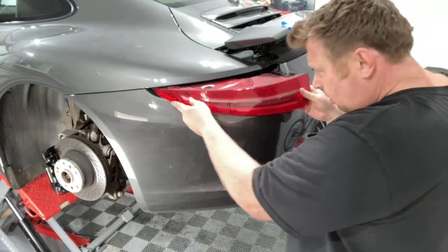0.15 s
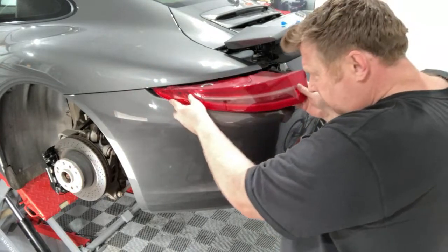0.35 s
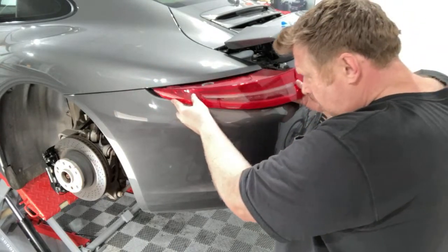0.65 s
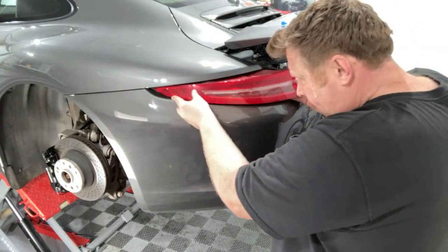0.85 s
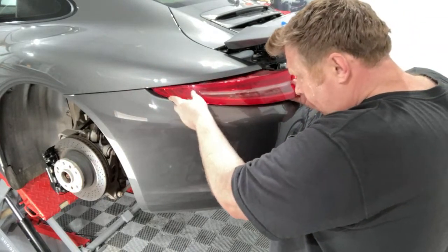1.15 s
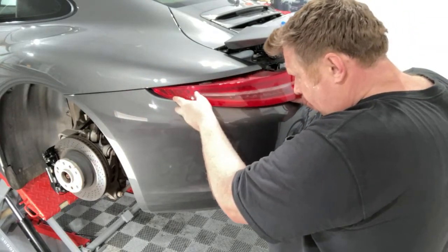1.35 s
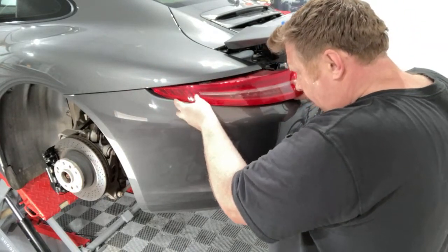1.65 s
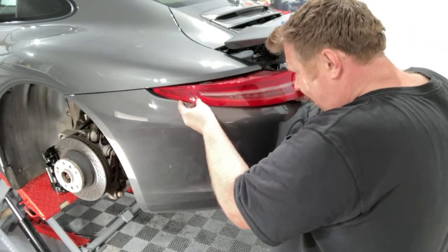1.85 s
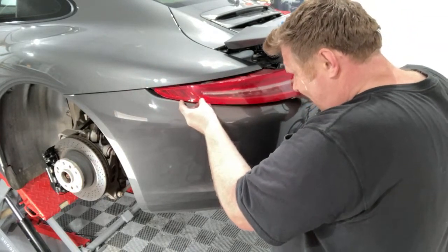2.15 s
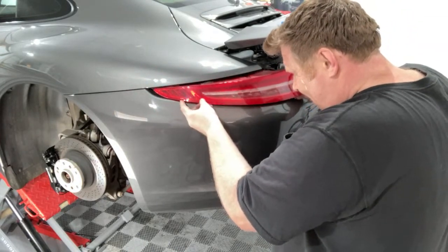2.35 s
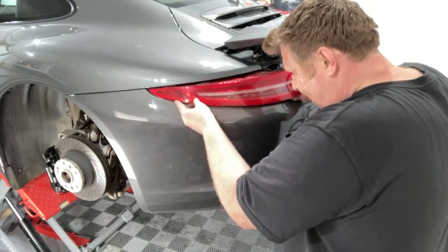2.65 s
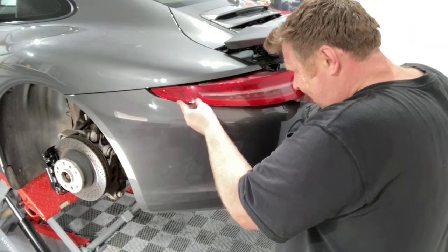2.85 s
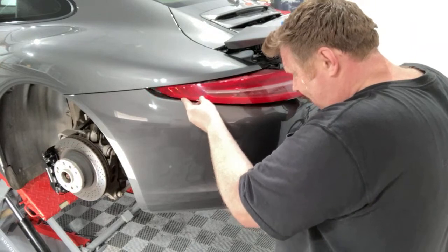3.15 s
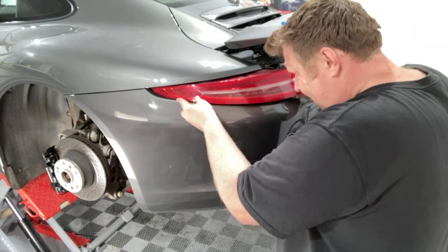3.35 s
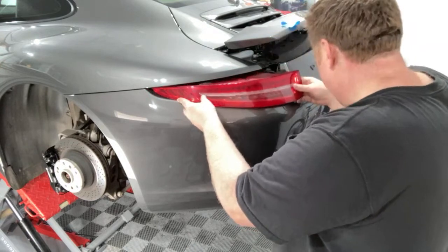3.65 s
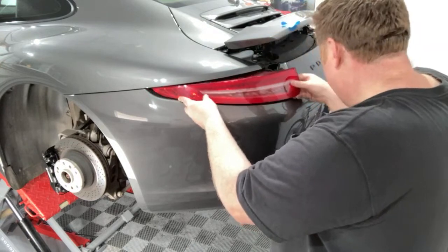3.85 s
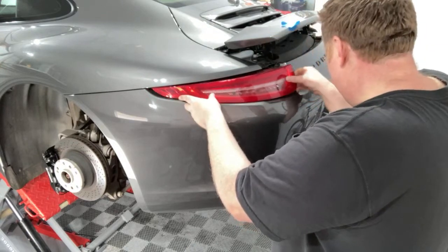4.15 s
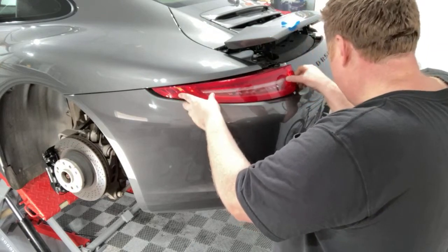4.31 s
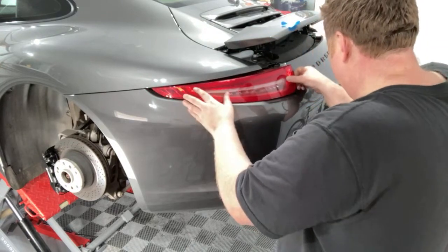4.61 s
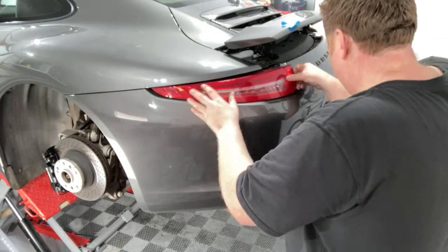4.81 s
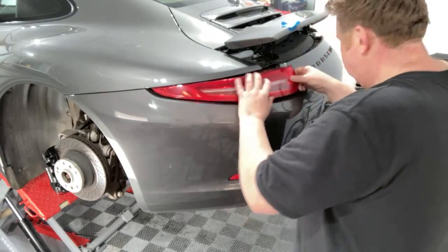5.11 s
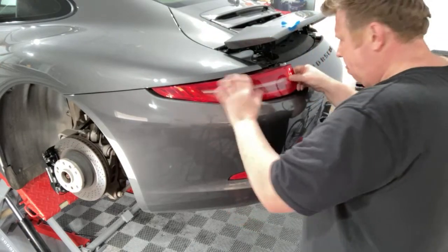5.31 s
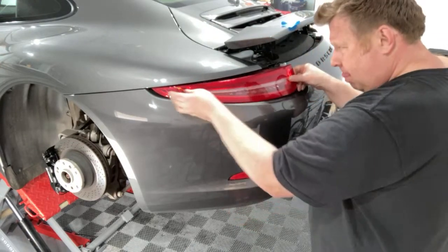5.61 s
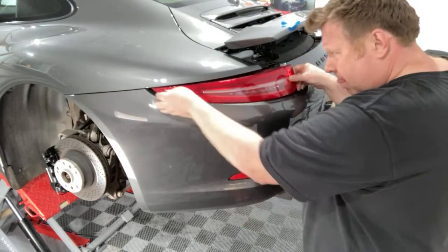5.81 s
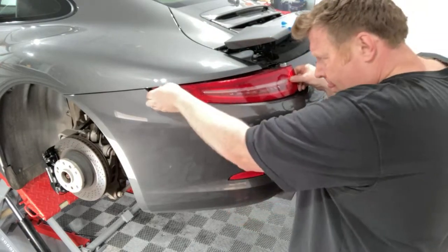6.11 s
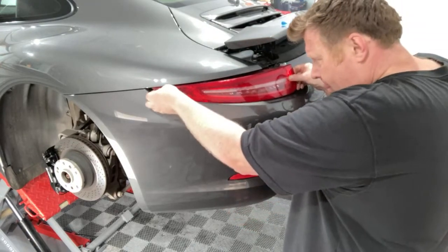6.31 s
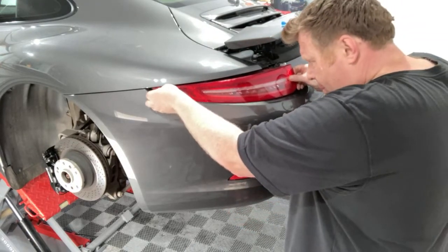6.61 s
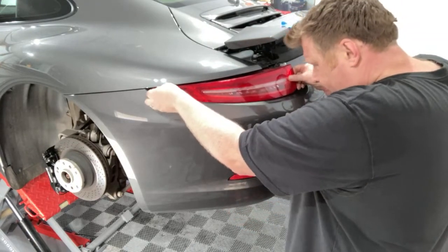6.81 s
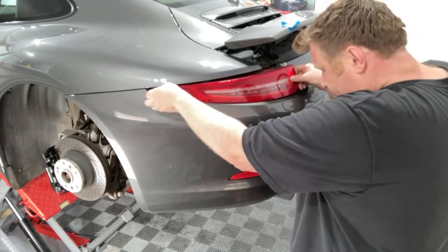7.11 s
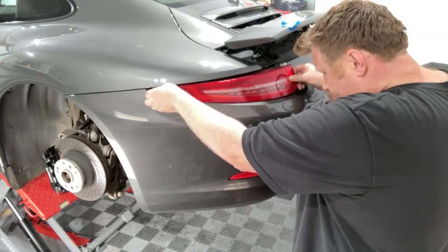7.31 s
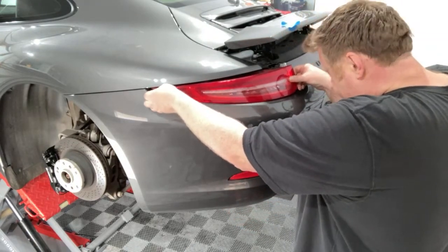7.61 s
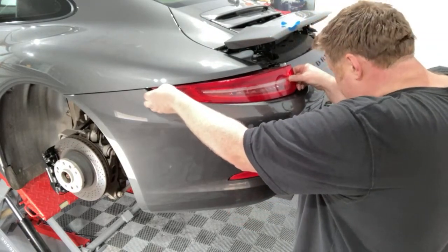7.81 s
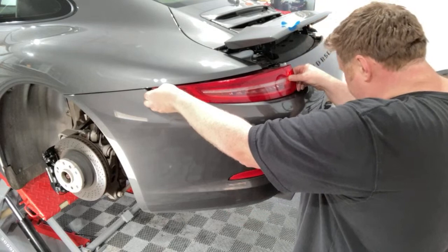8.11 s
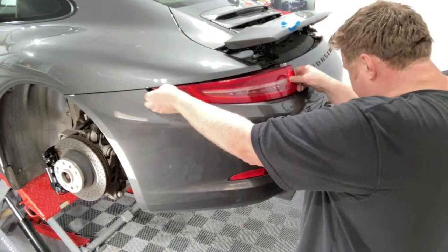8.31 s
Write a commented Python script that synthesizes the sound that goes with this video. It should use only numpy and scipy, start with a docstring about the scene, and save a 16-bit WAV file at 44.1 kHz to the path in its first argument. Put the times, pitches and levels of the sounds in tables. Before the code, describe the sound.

Hollow plastic knocks, clicks and short scrapes as a light housing is worked into a car panel, with brief rubbery squeaks in a ringing garage.

```python
"""A soft, dull knock opens over faint air: a plastic tail light is pushed into a car's rear wing in a home garage.
By stick and slip each tab creeps, lets go with a knock, then slides to rest; band noise models the plastic housing,
and resonators the drumming wing panel. Scrapes and ticks drive the same housing, flicked parts ring as sines,
a rubber seal squeaks, a sleeve rustles as swelling noise, and the bare room rings on for about a second."""
import sys
import numpy as np
from scipy import signal
from scipy.io import wavfile

SR = 44100
rng = np.random.default_rng(int(sys.argv[2]) if len(sys.argv) > 2 else 0)


def master(y):
    """Save y as 16-bit WAV."""
    cut = np.clip(np.atleast_2d(y).T, -1, 1)
    pcm = np.round(cut * 32767)  # scale
    wavfile.write(sys.argv[1], SR, pcm.astype(np.int16))


N = 373086
TIME = np.arange(N) / SR  # s
EDGES = np.geomspace(30, 17000, 25)  # band edges, Hz
CENTRES = np.sqrt(EDGES[1:] * EDGES[:-1])

# Tabs catching and letting go; thump and hardness are relative to the knock's own level:
# (time [s], relative level [dB], panel thump [dB], hardness [dB], slip time [s])
KNOCKS = [(.078, -49.5, 12, -9, 0.036), (.223, -41.5, -8, 4, .016), (.484, -44, 8, 1, 0.024),
          (1.108, -39.5, 4.5, -5, 0.02), (1.428, -38, 6.5, -8.5, 0.0043), (1.619, -40, -7.5, -2, 0.0054),
          (1.841, -45.5, 3.5, -9.5, 0.014), (2.028, -39.5, 4.5, -2.5, .004), (2.251, -37.5, 3.5, 6, 0.0009),
          (2.26, -36, -2, 5.5, .002), (2.605, -43.5, 1, -5, 0.013), (3.009, -49, -2, -19, 0.0065),
          (3.0873, -33, 0, -8, .002), (3.12, -40.5, 2, 1, 0.0016), (3.324, -31.5, -5, -6, .003),
          (3.637, -42.5, -3, -11, .004), (4.039, -44, 2, -8, 0.0027), (4.055, -40.5, 4, -3.5, 0.001),
          (4.091, -35, 2, 8, 0.0037), (4.127, -35, -8, 2.5, 0.0064), (4.227, -35.5, -6.5, -8, 0.01),
          (4.481, -48, -11, -21, 0.0021), (4.951, -42, -5, -10, 0.0013), (5.019, -45.5, 3, 5, 0.006),
          (5.164, -34.5, -4, 12.5, 0.005), (6.011, -42.5, 3, -12, 0.013), (6.054, -40, 7, -2, 0.0066),
          (6.173, -33.5, -0.5, 8.5, 0.0018), (6.441, -42.5, 2, 4, 0.0032), (6.612, -30.5, -1, -1, .0035),
          (6.919, -35.5, 5.5, 5.5, 0.0036), (7.045, -44.5, 1, 0.5, 0.0049), (7.33, -28, 6, 7, 0.0049),
          (7.556, -42.5, 3, -2, 0.006), (7.743, -42, -9, -5.5, .004), (7.904, -48.5, 2, -29, .012)]
# Reverberation of the garage: (frequency [Hz], time to die by 60 dB [s])
GARAGE_T60 = [(100, 0.6), (260, 0.82), (700, 1.2), (1800, 0.99), (4500, 0.79), (8000, 0.45), (14000, 0.2)]


def from_db(db):
    """Level to amplitude: 20 dB is a factor of ten."""
    return 10 ** (np.asarray(db) / 20)


def rms_one(x):
    """Normalization: equal mean power, rms 1."""
    return x / np.sqrt(np.mean(x ** 2) + 1e-20)


def at_centres(points):
    """Interpolation on a logarithmic frequency axis: a (Hz, value) table read at the band centres."""
    hz, value = np.transpose(points)
    return np.interp(np.log(CENTRES), np.log(hz), value)


def band(x, k):
    """Band analysis: a causal band-pass filter keeps band k."""
    sos = signal.butter(2, EDGES[k:k + 2], "band", fs=SR, output="sos")
    return signal.sosfilt(sos, x + 1e-18)


def wobble(rate):
    """Random modulation: straight lines join `rate` independent normal values a second."""
    steps = TIME * rate
    return np.interp(steps, np.arange(N), rng.standard_normal(N))


def coloured_noise(spectrum):
    """Spectral shaping: white noise is weighted band by band and scaled to rms 1."""
    white = rng.standard_normal((2, N))  # neighbouring bands use different noises
    gains = from_db(at_centres(spectrum))
    return rms_one(sum(gain * band(white[k % 2], k) for k, gain in enumerate(gains)))


def die_away(power, t60):
    """Leaky energy store: what is fed in leaks out exponentially, 60 dB in t60."""
    keep = from_db(-60 / (t60 * SR)) ** 2
    return signal.lfilter([1 - keep], [1, -keep], power + 1e-20)


def background(air_db=-57, hum_hz=59, hum_db=-68.5):
    """Broadband and tonal ambience: ventilation noise and a faint mains hum, levels as rms."""
    # Steady air of the garage: (frequency [Hz], relative spectral level [dB])
    air = [(30, -30), (45, -11), (60, -2.5), (90, -6.5), (150, -5.5), (350, -1), (600, -5.5), (1300, -10),
           (2200, -16.5), (4200, -25), (8000, -32.5), (16000, -37)]
    hum = np.sqrt(2) * np.sin(2 * np.pi * hum_hz * TIME)
    return from_db(air_db) * coloured_noise(air) + from_db(hum_db) * hum


def wash(x, build_s=0.016):
    """Diffuse field: countless echoes merge into noise that builds up, dies band by band and has the lamp's modes."""
    noises, out = lamp_modes(rng.standard_normal((2, N))), np.zeros(N)
    for k, t60 in enumerate(at_centres(GARAGE_T60)):
        building = die_away(band(x, k) ** 2, build_s)
        energy = die_away(building, t60)
        out += np.sqrt(energy) * rms_one(band(noises[k % 2], k))
    return out


def wall_echoes(x, build_s=0.002):
    """Linear room response: fixed paths between the walls repeat every sound with its own colour."""
    t = TIME[:SR]
    white, response = rng.standard_normal((2, SR)), 0
    for k, t60 in enumerate(at_centres(GARAGE_T60)):
        tail = (1 - np.exp(-t / build_s)) * from_db(-60 * t / t60)
        response = response + band(white[k % 2] * tail, k) / np.sqrt(np.sum(tail ** 2))
    return signal.oaconvolve(x, response)[:N]


def garage(x, diffuse_share=0.44):
    """Energy division: shelves and tools scatter part of the sound; bare walls mirror the rest."""
    share = np.clip(diffuse_share, 0, 1)
    return np.sqrt(share) * wash(x) + np.sqrt(1 - share) * wall_echoes(x)


def sleeve(crinkle_db=2.5, rest_db=-81, overall_db=-1):
    """Friction noise: fibres brush in a faint, finely crinkling hiss that swells once with each arm move."""
    # The arm shifts its grip: (middle [s], relative level [dB], length [s])
    arm_moves = [(1.0, -70, .4), (1.9, -71.5, 2.1), (4.0, -66, .7), (4.89, -66.5, 0.57),
                 (5.38, -62.5, 0.52), (7.5, -67, 0.23)]
    # Colour of the brushing cloth: (frequency [Hz], relative spectral level [dB])
    cloth = [(1000, -19), (3000, 4), (7000, -5), (10500, -3), (15500, -11.5)]
    swell = from_db(rest_db)
    for s, level_db, length_s in arm_moves:
        swell = swell + from_db(level_db) * np.exp(-2 * (2 * (TIME - s) / length_s) ** 2)
    crinkle = from_db(crinkle_db * wobble(970))
    hiss = rms_one(crinkle * coloured_noise(cloth))
    return from_db(overall_db) * swell * hiss


def seal_squeaks(jitter=0.007, attack_s=0.014, release_s=0.03, fall_db_per_s=78):
    """Regular stick-slip: rubber dragging over paint gives an unsteady low tone that sinks as the drag slows."""
    # Squeaks: (start [s], length [s], first pitch [Hz], pitch sag [Hz per s], level before the fall [dB])
    squeaks = [(4.112, 0.14, 378, 1200, -35.5), (5.024, 0.11, 343.4, 5, -37.5),
               (5.192, 0.1, 338.4, 22, -36.5)]
    out, unsteady = np.zeros(N), 1 + jitter * wobble(110)
    for s, length_s, pitch_hz, sag, level_db in squeaks:
        t = TIME[:int(length_s * SR)]
        start = int(s * SR)
        span = slice(start, start + len(t))
        gate = np.clip(np.minimum(t / attack_s, (length_s - t) / release_s), 0, 1)
        pitch = (pitch_hz - sag * t) * unsteady[span]
        phase = 2 * np.pi * np.cumsum(pitch) / SR
        out[span] += gate * from_db(level_db - fall_db_per_s * t) * np.sqrt(2) * np.sin(phase)
    return out


def twangs(above_knock_db=8.5, cycles=53):
    """Free vibration: a flicked tab, edge or patch of panel dies by 60 dB in a set number of cycles."""
    # Singing parts, each as loud as its nearest knock is strong: (time [s], pitch [Hz])
    flicks = [(1.429, 890), (2.251, 4160), (2.262, 3800), (2.605, 2270), (3.009, 1380), (3.087, 2430),
              (3.122, 4600), (3.324, 1554), (4.481, 558), (4.952, 1270), (6.173, 1365), (6.173, 423),
              (7.33, 2390)]
    out = np.zeros(N)
    for when, hz in flicks:
        s, level_db = min(KNOCKS, key=lambda knock: abs(knock[0] - when))[:2]
        start, t60 = int(s * SR), cycles / hz
        t = TIME[:min(int(t60 * SR), N - start)]
        decay = from_db(level_db + above_knock_db - 60 * t / t60)
        out[start:start + len(t)] += decay * np.sin(2 * np.pi * hz * t)
    return out


def ring(clicks, hz, t60):
    """Damped resonator: a unit click sets a sine of initial height 1 ringing."""
    r = from_db(-60 / (t60 * SR))
    w = 2 * np.pi * hz / SR
    return signal.lfilter([0, np.sin(w)], [1, -2 * r * np.cos(w), r * r], clicks + 1e-18)


def panel(spread_db=1.5, shove_s=0.0033):
    """Modal excitation: each knock shoves the wing, which drums; the place of the shove varies the mix of modes."""
    # Drum modes of the wing panel: (frequency [Hz], relative level [dB], time to die by 60 dB [s])
    drum_modes = [(135.4, -4, 0.26), (167.4, 1, 0.13), (196, -2, 0.12), (249, 3, 0.063)]
    s, level_db, thump_db = np.transpose(KNOCKS)[:3]
    chance_db = spread_db * rng.standard_normal((len(s), len(drum_modes)))
    shove, out = np.hanning(int(shove_s * SR) + 3), np.zeros(N)
    for k, (hz, mode_db, t60) in enumerate(drum_modes):
        clicks = np.zeros(N)
        clicks[(s * SR).astype(int)] = from_db(level_db + thump_db + mode_db + chance_db[:, k])
        out += (-1) ** k * ring(clicks, hz, t60)  # neighbouring modes move in opposite senses
    return signal.fftconvolve(out, shove / shove.sum())[:N]


def snap(slip_s):
    """Sudden release: energy flow swells fast and dies in a few slip times; sum 1."""
    u = np.arange(int(5 * slip_s * SR) + 2) / (slip_s * SR)
    flow = u * np.exp(-3 * u)
    return flow / flow.sum()


def stroke(length_s, unit_s=0.018):
    """Sliding work: one smooth hump of energy flow that gives more energy the longer it lasts."""
    return 2 * np.hanning(int(length_s * SR) + 3) / (unit_s * SR)


def contact_power(table, flow_of, grain_db, grains_per_s, crack_db=-7, crack_share=0.56, edge_db=-11.5):
    """Contact spectrum: hardness brightens each contact; stick and slip break it into uneven grains."""
    # Where the colours of a contact lie: thump, body from and to, crack, edge [Hz]
    colour_hz = [200, 450, 1500, 4000, 9500]
    power = np.zeros((len(CENTRES), N), np.float32)
    grains = from_db(grain_db * wobble(grains_per_s)) ** 2
    for s, level_db, thump_db, hard_db, length_s in table:
        start = int(s * SR)
        smooth = flow_of(max(length_s, 1 / 2000))[:N - start]
        flow = smooth * grains[start:start + len(smooth)]
        flow_kept = flow * smooth.sum() / flow.sum()  # grains leave the total energy alone
        # Hardness lifts the sharp edge fully and the crack by a share, against the body
        colour_db = [thump_db, 0, 0, crack_db + crack_share * hard_db, edge_db + hard_db]
        colour = at_centres(list(zip(colour_hz, colour_db)))
        power[:, start:start + len(flow)] += np.outer(from_db(level_db + colour) ** 2, flow_kept)
    return power


def housing(power, crack_hz=3660.0):
    """High modal density: in crowded plastic modes treble leaves at once as a crack; bass is stored and rings out."""
    # Housing and panel when struck: (frequency [Hz], relative spectral level [dB])
    struck_colour = [(45, -25), (95, -6.5), (150, 1), (300, 3.5), (550, 2.5), (1100, -0.5), (1700, -3.5),
                     (2500, -4.5), (3100, -4.5), (4000, -4), (5700, -8.5), (8200, -10), (12000, -19),
                     (15500, -26.5)]
    # How long they ring: (frequency [Hz], time to die by 60 dB [s])
    ring_times = [(100, 0.21), (250, 0.35), (600, 0.25), (1500, 0.23), (4000, 0.072), (12000, 0.027)]
    white, out = rng.standard_normal((2, N)), np.zeros(N)
    gains = from_db(at_centres(struck_colour))
    for k, (gain, t60) in enumerate(zip(gains, at_centres(ring_times))):
        at_once = CENTRES[k] / (CENTRES[k] + crack_hz)
        energy = at_once * power[k] + (1 - at_once) * die_away(power[k], t60)
        out += gain * band(white[k % 2] * np.sqrt(energy), k)
    return out


def lamp_modes(x):
    """Resonance: a few modes stand out of the crowd in every contact."""
    # Strongest modes, panel first, then lens and tabs: (frequency [Hz], width [Hz], boost [dB])
    strong_modes = [(340.6, 42, 4.5), (414, 23, 3.5), (533, 35, 4), (1420, 40, 0.5), (2550, 27, 8),
                    (3080, 110, 2.5), (3850, 500, 4), (4990, 200, 5), (8190, 120, 6.5)]
    for hz, width_hz, boost_db in strong_modes:
        peak = signal.lfilter(*signal.iirpeak(hz, hz / width_hz, fs=SR), x)
        x = x + (from_db(boost_db) - 1) * peak
    return x


def lamp(contact_db=42.5, scrape_db=-1.5, panel_db=-4):
    """Stick-slip excitation: knocks, ticks and scrapes drive one housing; a creep precedes and a slide follows knocks."""
    # Edges sliding in the recess: (time [s], relative level [dB], panel thump [dB], hardness [dB], length [s])
    scrapes = [(.11, -60, 17.5, -18, 0.18), (.95, -51, -1, -12, 0.034), (1.37, -53, 10.5, -3, 0.048),
               (1.46, -49, 5, 3, 0.045), (1.72, -59.5, 1, -2, 0.089), (2.37, -56.5, 6, 2, 0.05),
               (3.55, -51.5, 19, -8, 0.014), (3.78, -54, 1, -6.5, .11), (4.14, -45, -4, -16, .03),
               (4.24, -45, -11, -23, 0.039), (5.21, -39, 3, 0, 0.031), (5.325, -38, 5, -4.5, 0.037),
               (5.79, -59, 15, -29, 0.064), (6.13, -47.5, 12, -17, 0.017), (6.31, -44, 0, -20, 0.019),
               (6.5, -47.5, 1, 0, 0.023), (6.58, -40.5, -8, -18, 0.042), (8.32, -56.5, -9, -11, 0.04)]
    # Clips clicking lightly, too weak to shake the wing: (time [s], relative level [dB])
    light_clicks = [(1.961, -54.5), (2.704, -57), (4.86, -64.5), (6.418, -50), (7.759, -51), (7.94, -58),
                    (8.063, -89)]
    creep_s, creep_db = 0.0092, -15.5  # level against the knock
    settle_after_s, settle_s, settle_db, settle_hardness_db = 0.035, 0.023, -14.5, -22.5
    tick_s, tick_bass_db, tick_hardness_db = 0.0014, 1, 7
    creeps, settles = [], []
    for s, db, thump, hard, _ in KNOCKS:
        creeps.append((s - 0.96 * creep_s, db + creep_db, thump, hard, creep_s))
        settles.append((s + settle_after_s, db + settle_db, thump, hard + settle_hardness_db, settle_s))
    ticks = [(s, db, tick_bass_db, tick_hardness_db, tick_s) for s, db in light_clicks]
    snaps = contact_power(list(KNOCKS) + ticks, snap, grain_db=8.0, grains_per_s=2200)
    slides = contact_power(list(scrapes) + creeps + settles, stroke, grain_db=10.0, grains_per_s=840)
    crowd = housing(snaps + float(from_db(scrape_db)) ** 2 * slides)
    return from_db(contact_db) * lamp_modes(crowd) + from_db(panel_db) * panel() + twangs()


def scene(garage_db=-3, squeak_room_db=-1.0):
    """Superposition: the lamp, echoes and small sounds; squeaks echo in the garage almost as strongly as knocks."""
    contacts, squeaks = lamp(), seal_squeaks()
    echoes = from_db(garage_db) * garage(contacts + from_db(squeak_room_db) * squeaks)
    return (contacts + squeaks + echoes + sleeve() + background())[None]


def record(dry, low_cut_hz=56.6, cutoff_hz=16000):
    """Band limiting: the small microphone loses the deepest bass and the top is cut; the level dips once."""
    # The whole sound fades away briefly and snaps back
    fade_from_s, fade_db_per_s, back_at_s, back_s = 0.27, 320, 0.472, 0.0087
    still_faded = np.clip(1 - (TIME - back_at_s) / back_s, 0, 1)
    dip_db = -fade_db_per_s * np.maximum(TIME - fade_from_s, 0) * still_faded
    low_cut = signal.butter(4, low_cut_hz, "high", fs=SR, output="sos")
    heard = signal.sosfilt(low_cut, dry) * from_db(dip_db)
    top_cut = signal.ellip(10, 0.2, 70, cutoff_hz, fs=SR, output="sos")
    return signal.sosfilt(top_cut, heard)


dry = scene()
out = record(dry)
master(out)
```